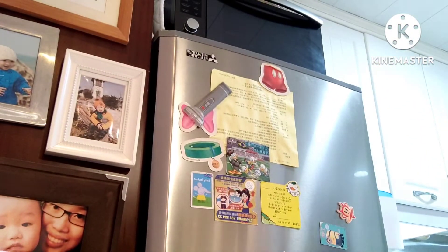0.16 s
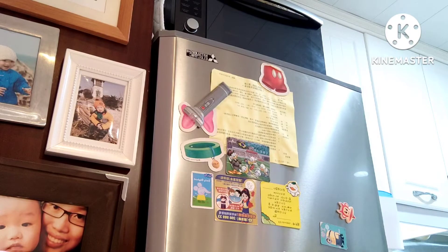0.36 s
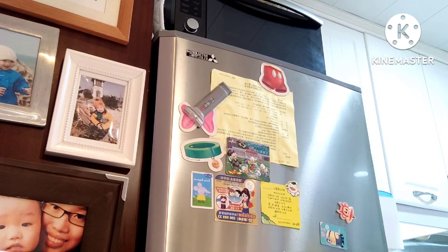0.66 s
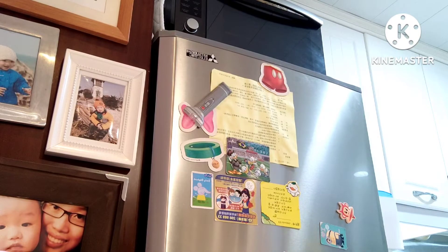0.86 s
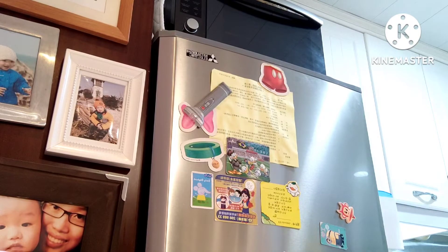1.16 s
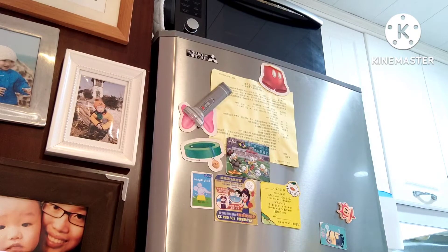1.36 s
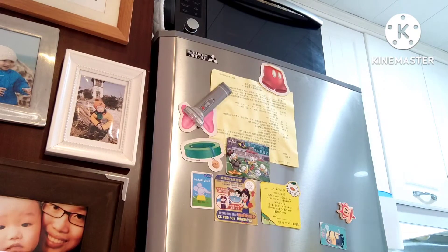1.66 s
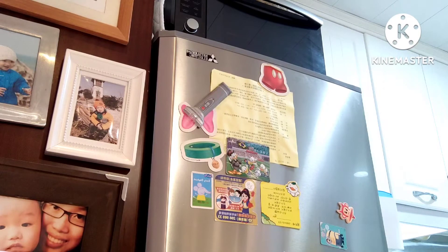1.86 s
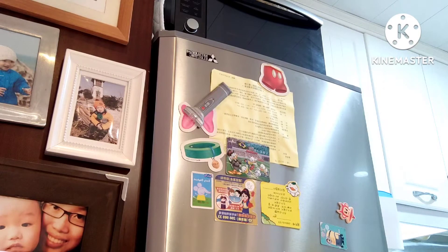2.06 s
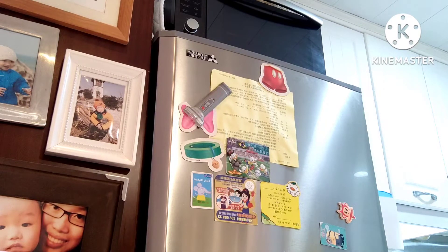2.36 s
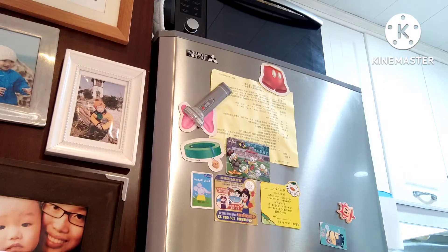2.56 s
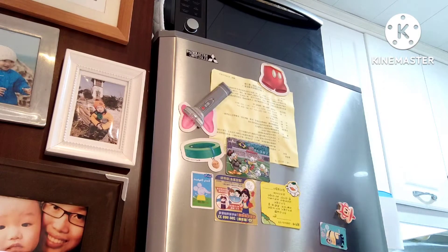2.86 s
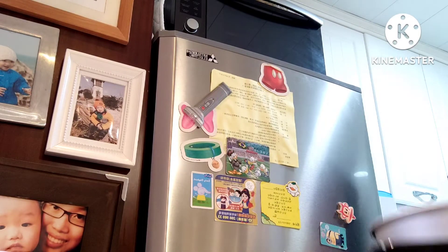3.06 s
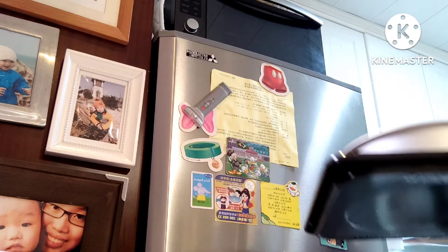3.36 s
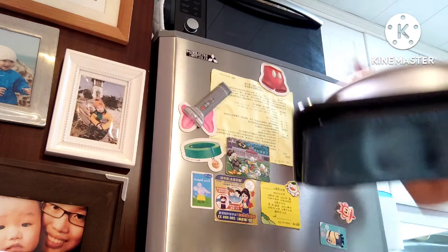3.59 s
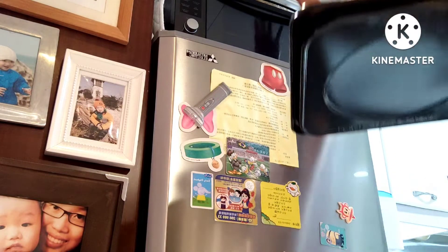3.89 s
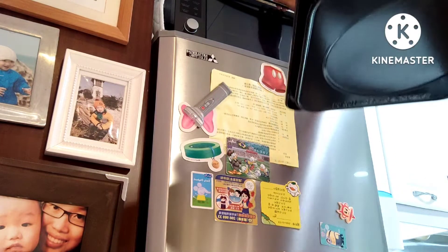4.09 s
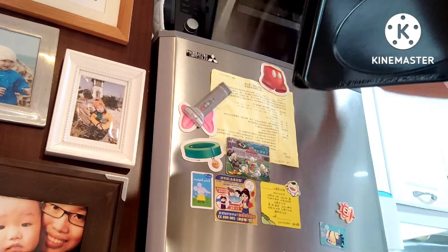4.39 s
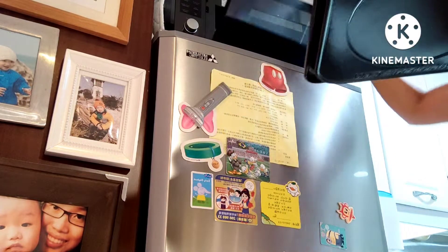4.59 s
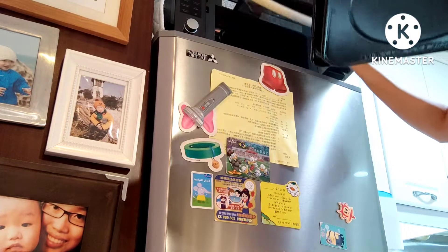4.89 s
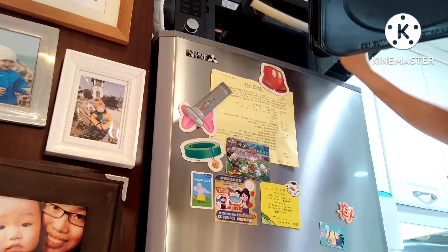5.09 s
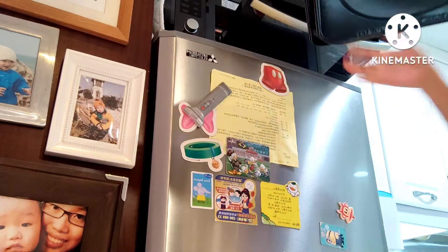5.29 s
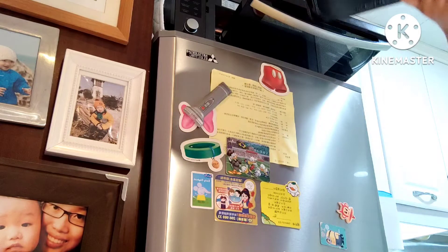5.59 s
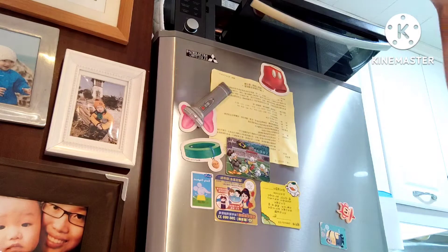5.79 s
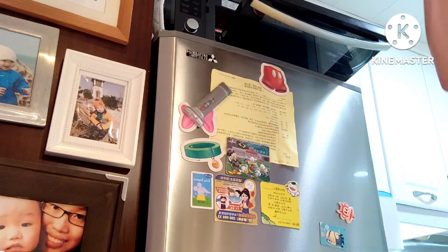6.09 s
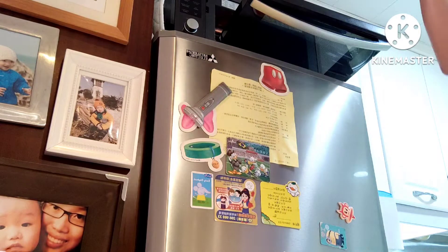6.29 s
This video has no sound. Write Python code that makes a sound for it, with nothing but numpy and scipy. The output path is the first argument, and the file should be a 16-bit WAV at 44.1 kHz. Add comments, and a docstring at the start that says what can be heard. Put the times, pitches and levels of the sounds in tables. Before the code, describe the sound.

A small kitchen heard through a close stereo microphone, with soft low room noise and a faint steady hum. Cloth swishes at the start; around 0.6 to 0.7 seconds a metal cake pan is touched with a muffled, moderate knock. Faint scuffs and a small tap lead to a loud, bright clank at 1.7 with a rapid chatter on the rim, dying quickly, and a second strong, heavier clank at 2.03. Both have short sheet-metal ringing and brief room reflections. Sleeves and feet rustle through 2 to 3 seconds, with very faint bumps near 2.6. At 3.4 comes one dull, softer knock, then more swishing. From 4.1 to 4.45 an oven door is gripped and swung open with light knocks and clicks. Tiny ticks follow at 5.1 to 5.3, and then quiet room hum remains until about 6.4.

```python
"""Cake pan and oven door

A metal cake pan is picked up in a small kitchen: scuffs, two clanks and a dull knock. Then a countertop
oven's door is gripped and swung open with light knocks and clicks. Each blow is a contact force driving
broad sheet-metal noise, room reflections and decaying modes. Clothes and feet rustle as shaped noise;
steady low tones, the lowest perhaps a fridge, sound as sines over low room noise."""
import sys
import numpy as np
from scipy import signal
from scipy.fft import rfft, irfft, next_fast_len
from scipy.io import wavfile

SR = 44100
rng = np.random.default_rng(int(sys.argv[2]) if len(sys.argv) > 2 else 0)


def output_pcm(signal):
    """Save a mono or channel-first signal as 16-bit PCM at the path in sys.argv[1].

    Samples are clipped to [-1, 1] before scaling.
    """
    pcm = np.clip(np.atleast_2d(signal).T, -1, 1) * 32767
    wavfile.write(sys.argv[1], SR, np.round(pcm).astype(np.int16))


N = 284430
TIME = np.arange(N) / SR


def cake_pan():
    """Blows set the pan's bottom and walls ringing; some rebound on the rim."""
    # blows: t/s, relative level/dB, contact cut-off/Hz, thump/dB, metallic tick/dB, struck spot/Hz, rebounds
    pan_blows = [ (0.590, -36, 1000, 8, -8, 500, 0), (0.637, -29.5, 1300, 6, -2, 500, 0),
                 (0.652, -21, 1390, 2, -13, 413, 2), (0.672, -24, 1860, 0.5, -3.5, 165, 0),
                 (0.677, -12.5, 1060, -17, -28, 940, 0), (1.012, -41, 1400, 10, -22.5, 860, 0),
                 (1.390, -43.5, 1200, -1, 8, 990, 0), (1.500, -26, 2220, 2.5, -6, 577, 0),
                 (1.6912, 0.4, 2060, 1, -1.5, 500, 3), (1.775, -4.5, 1180, -1, -5.5, 870, 1),
                 (1.812, -14.5, 1000, 11.5, 0.5, 230, 1), (2.030, -5, 2020, 10, -2.5, 1000, 0),
                 (2.035, -0.5, 1790, -5, -8, 235, 1), (2.612, -36, 1300, 19, 1, 553, 0),
                 (2.660, -40.5, 1200, 19.5, -13, 252, 0), (3.431, -11.5, 1100, 3, -14.5, 880, 0)]
    # broad resonances of bottom and walls: f/Hz, width/Hz, added level/dB
    pan_body = [(168, 18, -1.5), (260, 16, -14), (654, 44, 2.5), (710, 36, 2.5), (903, 37, -5.5),
                (990, 24, -16), (1199, 54, -15), (1220, 59, -4), (1820, 360, -4), (1820, 68, -18)]
    # ringing modes: f/Hz, relative level/dB, t60/s
    pan_modes = [(235, -33, 0.12), (407, 3, 0.3), (509.6, 3, 0.094), (657, -9.5, 0.4), (640, -6, 0.11),
                 (739, -28, 0.24), (829.4, 10, 0.18), (907, 0, 0.18), (940, -2, 0.19), (980, 5.5, 0.22),
                 (1163, 8, 0.21), (1260, -27, 0.25), (1250, -6, 0.37), (1260, 8, 0.29), (1346, -1, 0.084),
                 (1494, -6, 0.4), (1600, -21, 0.14), (1575, -8, 0.44), (1800, 5, 0.11), (1900, -26, 0.29),
                 (2130, -6.5, 0.45)]
    return struck(with_rebounds(pan_blows), pan_body, pan_modes, lag_s=0.00021,
                  direct_db=11.5, room_db=-11.5, ring_db=-34.5, balance_db=0.5)


def oven_door():
    """Light contacts drive the door's broad resonances and a few ringing modes."""
    # contacts: t/s, relative level/dB, contact cut-off/Hz, thump/dB, metallic tick/dB, struck spot/Hz
    door_blows = [ (4.100, -20, 630, 15, -4, 168), (4.108, -21.5, 1990, -7, 5, 390),
                  (4.119, -29, 1600, 18.5, -9, 138), (4.224, -34, 2000, 7, -3, 950),
                  (4.272, -22.5, 2400, -15, -23, 1480), (4.376, -22.5, 1500, -16, 8.5, 930),
                  (4.390, -18, 1030, -17, -14, 660), (4.440, -39.5, 800, 26.5, -18, 198),
                  (5.137, -40, 920, 17, 0.5, 500), (5.215, -32.5, 686, 4, -11, 230),
                  (5.295, -37.5, 1800, -4, 1.5, 795), (5.331, -33.5, 2300, 4, 3, 9900)]
    # broad resonances: f/Hz, width/Hz, added level/dB
    door_body = [(143, 32, 8), (597, 45, -4), (810, 105, -1), (960, 39, -12)]
    # ringing modes: f/Hz, relative level/dB, t60/s
    door_modes = [(612, 3, 0.25), (640, 2, 0.24), (760, 11, 0.14), (1000, 1, 0.15)]
    return struck(door_blows, door_body, door_modes, lag_s=0.00003,
                  direct_db=5.0, room_db=-15.5, ring_db=-41.0, balance_db=-1.5)


def with_rebounds(blows):
    """A loose pan chatters on its rim: evenly spaced, ever weaker rebounds that favour ever lower modes."""
    gap_s, loss_db, lighter_thump_db = 0.0082, 4, 6.0
    pitch_ratio = 0.82   # per rebound, from the contact cut-off down
    touches = []
    for s, level_db, cutoff_hz, thump_db, tick_db, spot_hz, rebounds in blows:
        touches.append((s, level_db, cutoff_hz, thump_db, tick_db, spot_hz))
        for k in range(1, round(rebounds) + 1):
            rebound_s = s + k * gap_s
            rebound_db = level_db - k * loss_db
            rim_hz = cutoff_hz * pitch_ratio ** k
            touches.append((rebound_s, rebound_db, cutoff_hz, thump_db - lighter_thump_db, tick_db, rim_hz))
    return touches


def struck(blows, body, modes, lag_s, direct_db, room_db, ring_db, balance_db, near_db=-2.5, near_s=0.041):
    """Blows on sheet metal: the crack reaches the left port lag_s early, with reflections and ring."""
    # crowded, quickly damped sheet-metal modes: f/Hz, level/dB
    sheet = [(50, -16.5), (110, -14), (175, -3), (230, -2), (310, -3), (480, 3), (700, -1), (1000, 1.5),
             (1350, 2.5), (1600, -4.5), (1900, -3.5), (2800, -8), (6000, -12.5), (14000, -13.5)]
    t, lag = TIME[:24000], round(lag_s * SR)
    clatter, rings = np.zeros((2, 2, N))
    crack = np.zeros((2, len(t)))
    crack[0, 0] = crack[1, lag] = from_db(direct_db)
    # near walls answer first and loudest
    reflected = from_db(room_db) * (1 + from_db(near_db) * np.exp(-(t / near_s) ** 2))
    hz, mode_db, t60_s = np.transpose(modes + overtones())
    decay_and_spin = 2j * np.pi * hz - np.log(1000) / t60_s
    waves = from_db(mode_db)[:, None] * np.exp(np.outer(decay_and_spin, t))

    for (s, level_db, *touch), tail in zip(blows, room_tails(t, count=len(blows))):
        force = from_db(level_db) * contact(*touch)[None]
        tail = np.array([tail[0], np.roll(tail[1], lag)])   # reflections share the lag
        add(clatter, signal.fftconvolve(crack + reflected * tail, force), s)
        ring = from_db(ring_db) * ringing(waves, hz, lag_s)
        add(rings, signal.fftconvolve(ring, force), s)

    balance = from_db([[balance_db / 2], [-balance_db / 2]])
    return (resonant(coloured(clatter, sheet), body) + rings) * balance


def contact(cutoff_hz, thump_db, tick_db, spot_hz, spot_db=0.0, spot_q=7.3, chatter_db=-3.0, chatter_s=0.0049):
    """Force of one touch: rounded push, the weight behind it, and a bare-metal tick with brief chatter."""
    click = signal.unit_impulse(2048)
    chatter = rng.standard_normal(len(click)) ** 3 * np.exp(-TIME[:len(click)] / chatter_s)
    chatter = from_db(chatter_db) * chatter / np.linalg.norm(chatter)
    push = cut(click, cutoff_hz, "low", order=4)
    thump = from_db(thump_db) * cut(click, hz=230, kind="low")
    tick = from_db(tick_db) * cut(click + chatter, hz=2300, kind="high")
    # the struck spot feeds some modes more than the rest
    return resonant(push + thump + tick, [(spot_hz, spot_hz / spot_q, spot_db)])


def ringing(waves, hz, lag_s, spread_db=3.5, swell_s=0.00081):
    """Every blow sets each mode going with its own strength and phase."""
    strength = from_db(spread_db * rng.standard_normal(len(hz)))
    left_lead_cycles = hz * lag_s * rng.uniform(0, 2.16, len(hz)) * [[1], [0]]
    phase = 2 * np.pi * (rng.random(len(hz)) + left_lead_cycles)
    swell = 1 - np.exp(-TIME[:waves.shape[1]] / swell_s)
    return (strength * np.exp(1j * phase) @ waves).real * swell


def overtones(level_db=-15.0, t60_s=0.45, count=44):
    """Thin high modes scattered over the treble: f/Hz, relative level/dB, t60/s."""
    hz = np.geomspace(2300, 9300, count) * rng.uniform(0.988, 1.012, count)
    return [(f, level_db, t60_s) for f in hz]


def room_tails(t, count):
    """Dense reflections for several blows; each octave dies at its own rate."""
    # reverberation: f/Hz, t60/s
    room_t60 = [(125, 0.29), (250, 0.41), (500, 0.36), (1000, 0.41), (2500, 0.4), (6000, 0.41),
                (12000, 0.2)]
    field = rfft(diffuse(apart_hz=880, size=count * len(t)).reshape(2, count, len(t)))
    bin_hz = np.arange(field.shape[-1]) * SR / len(t)
    octave = np.round(np.log2(np.maximum(bin_hz, 125) / 125))
    tails = 0
    for k in range(8):
        decay = np.exp(-np.log(1000) * t / at_hz(room_t60, 125 * 2 ** k))
        tails = tails + irfft(field * (octave == k)) * decay
    return tails.swapaxes(0, 1)


def rustle():
    """Sleeves swish and feet scuff: strokes stand out of a background rustle that rises and sinks."""
    # background rustle of clothes that rises and sinks: t/s, relative level/dB
    bustle = [(0.0, -58.5), (0.36, -57.5), (0.8, -61.5), (1.2, -65.5), (1.46, -57.5), (1.92, -50),
              (2.42, -53.5), (2.69, -57.5), (2.9, -53.5), (3.39, -60), (3.7, -56), (4.55, -57.5),
              (4.8, -66), (5.15, -69.5), (5.42, -66.5), (5.8, -71), (6.4, -64.5)]
    # sleeve or foot: start/s, attack/s, hold/s, fade/(dB/s), relative swish/dB, scuff re swish/dB before trims
    strokes = [ (0.058, 0.1, .01, 58, -48.5, -9.5), (0.825, 0.045, 0.013, 107, -53.5, -4.5),
               (1.484, 0.063, 0.036, 139, -51.5, -6), (1.926, 0.039, .005, 186, -43.5, -13),
               (2.465, 0.074, 0.0058, 230, -47, -13), (2.71, 0.017, 0.12, 82, -70.5, 8.5),
               (2.862, .12, .01, 65, -49, -10.5), (3.43, 0.055, .07, 103, -58.5, -10),
               (3.563, 0.021, 0.012, 206, -46, -6.5), (3.775, 0.069, 0.11, 127, -45.5, -5.5),
               (4.199, 0.051, 0.072, 200, -45, -7.5)]
    # cloth spectrum: f/Hz, level/dB
    swish_spectrum = [(2000, -49), (5000, -8), (7500, -3.5), (10000, -0.5), (14000, -2.5)]
    # scuff spectrum: f/Hz, level/dB
    scuff_spectrum = [(200, -10), (700, -3), (1600, -1.5), (3000, 2.5), (5500, -1), (9000, -14),
                      (14000, -42)]
    swish_power = from_db(np.interp(TIME, *np.transpose(bustle))) ** 2
    scuff_power = swish_power * from_db(-7) ** 2
    for *shape, swish_db, scuff_db in strokes:
        power = (from_db(swish_db) * stroke(*shape)) ** 2
        swish_power = swish_power + power
        scuff_power = scuff_power + power * from_db(scuff_db) ** 2
    # trims: swish +2 dB, scuff +3 dB
    swish = rubbing(swish_spectrum, 10 * np.log10(swish_power) + 2.0, grain_db=0.9)
    scuff = rubbing(scuff_spectrum, 10 * np.log10(scuff_power) + 3.0, grain_db=0.65)
    return swish + scuff


def stroke(start_s, attack_s, hold_s, fade_db_per_s):
    """Cloth gathers speed, slides and comes to rest: gain over time."""
    t = TIME - start_s
    attack = np.sin(np.pi / 2 * np.clip(t / attack_s, 0, 1)) ** 2
    return attack * from_db(-fade_db_per_s * np.maximum(t - attack_s - hold_s, 0))


def rubbing(spectrum, level_db, grain_db, grains_per_s=300):
    """Fibres catch and slip: noise whose level flutters from grain to grain."""
    count = int(grains_per_s * N / SR)
    grains = np.interp(TIME, np.linspace(0, N / SR, count), rng.standard_normal(count))
    noise = diffuse(apart_hz=500) * from_db(grain_db * grains)
    return from_db(level_db) * rms_one(coloured(noise, spectrum))


def kitchen(air_db=-55.0, tones_db=-1.5, draught_db=-55.0):
    """Low room noise, steady low sines and a faint low-passed draught on each port."""
    # room noise spectrum: f/Hz, level/dB
    air_spectrum = [(19, -23), (32, -10), (54, 0.5), (70, -30), (92, -2), (194, -3.5), (291, -0.5),
                    (400, -8.5), (671, -11), (768, -12.5), (841, -13), (1410, -21), (1770, -22.5),
                    (7000, -37), (9100, -62), (15400, -120)]
    # steady low tones, the lowest perhaps a fridge: f/Hz, rms level before tones_db trim/dB
    low_tones = [(102.3, -66.5), (222, -66), (345, -68)]
    tones = 0
    for hz, db in low_tones:
        tones = tones + from_db(db + tones_db) * np.sqrt(2) * np.sin(2 * np.pi * (hz * TIME + rng.random()))
    air = rms_one(coloured(diffuse(apart_hz=460), air_spectrum))
    draught = rms_one(cut(rng.standard_normal((2, N)), hz=29.6, kind="low"))
    return from_db(air_db) * air + tones + from_db(draught_db) * draught


def from_db(db):
    """Amplitude ratio of a level in dB."""
    return 10 ** (np.asarray(db) / 20)


def rms_one(x):
    """Scale to unit rms."""
    return x / np.sqrt(np.mean(x ** 2) + 1e-20)


def at_hz(points, hz):
    """Read a table of (f/Hz, value) on a log-frequency axis."""
    known_hz, values = np.transpose(points)
    return np.interp(np.log(np.maximum(hz, 1)), np.log(known_hz), values)


def cut(x, hz, kind, order=2):
    """Butterworth low- or high-pass."""
    sos = signal.butter(order, np.clip(hz, 10, SR / 2 - 10), kind, fs=SR, output="sos")
    return signal.sosfilt(sos, x)


def coloured(x, spectrum):
    """Causal (minimum-phase) filter that follows a table of (f/Hz, level/dB)."""
    size = 2 * next_fast_len(x.shape[-1] // 2 + SR // 10)
    gain = from_db(at_hz(spectrum, np.arange(size // 2 + 1) * SR / size))
    cepstrum = irfft(np.log(gain))
    # fold onto positive time
    cepstrum[1:size // 2] *= 2
    cepstrum[size // 2 + 1:] = 0
    return irfft(rfft(x, size) * np.exp(rfft(cepstrum)))[..., :x.shape[-1]]


def resonant(x, peaks):
    """Add a band-passed copy of the sound at each (f/Hz, width/Hz, added level/dB) resonance."""
    total = x
    for hz, width_hz, db in peaks:
        b, a = signal.iirpeak(hz, hz / width_hz, fs=SR)
        total = total + from_db(db) * signal.lfilter(b, a, x)
    return total


def diffuse(apart_hz, size=N):
    """Noise from all sides: both ports hear nearly the same bass and unrelated treble."""
    mid, side = rng.standard_normal((2, size))
    side = cut(side, apart_hz, "high") + 0.017 * side
    return (mid + side * [[1], [-1]]) / np.sqrt(2)


def add(track, sound, start_s):
    """Mix a sound into a stereo track."""
    start = round(start_s * SR)
    track[:, start:start + sound.shape[1]] += sound[:, :N - start]


def scene():
    """Pan, door, rustle and room noise together."""
    return cake_pan() + oven_door() + rustle() + kitchen()


def record(dry):
    """Each microphone port colours the treble, the highest peaks are rounded and the top is cut."""
    # left port's treble resonance: f/Hz, level/dB
    left_port = [(5500, 1), (7200, 3), (9300, 3.5), (10800, 11.5), (12000, 5), (14000, -3.5)]
    # right port's treble resonance: f/Hz, level/dB
    right_port = [(5500, 1.5), (7500, 4.5), (8600, 12.5), (9700, 6), (11300, -4.5), (14000, -8.5)]
    heard = np.array([coloured(dry[0], left_port), coloured(dry[1], right_port)])
    heard = heard / (1 + (heard / 0.8) ** 4) ** 0.25   # soft limit at 0.8
    top_cut = signal.ellip(12, 0.1, 90, 14250, fs=SR, output="sos")
    return signal.sosfilt(top_cut, heard)


dry = scene()
out = record(dry)
output_pcm(out)
```